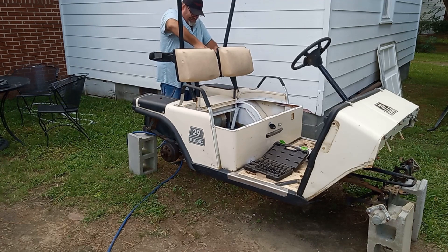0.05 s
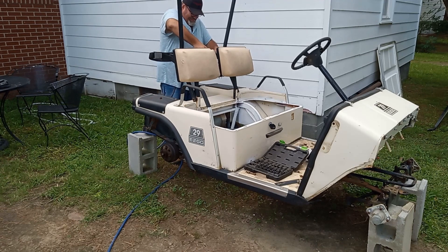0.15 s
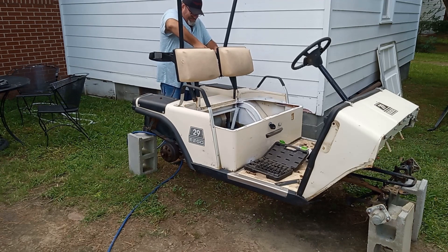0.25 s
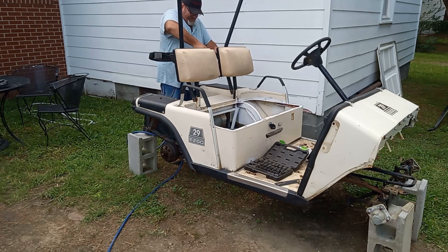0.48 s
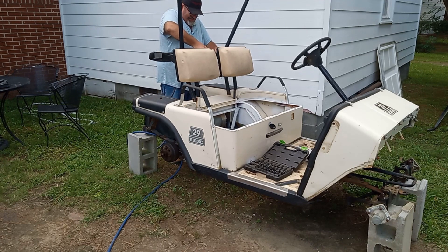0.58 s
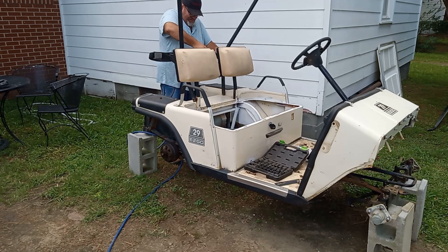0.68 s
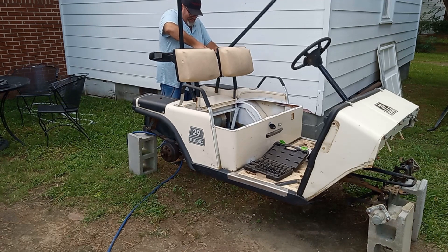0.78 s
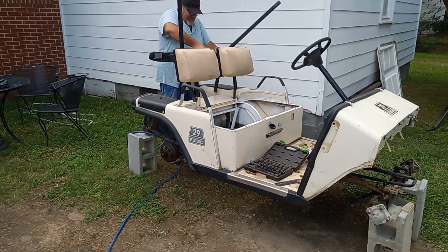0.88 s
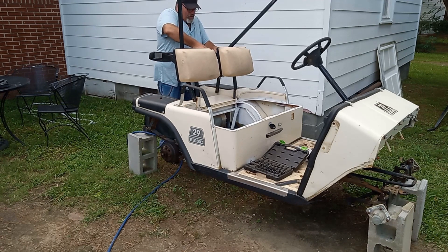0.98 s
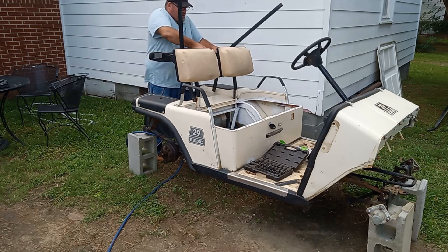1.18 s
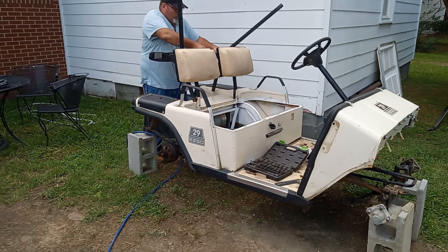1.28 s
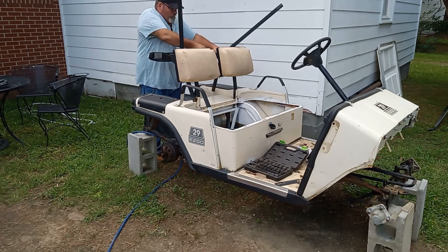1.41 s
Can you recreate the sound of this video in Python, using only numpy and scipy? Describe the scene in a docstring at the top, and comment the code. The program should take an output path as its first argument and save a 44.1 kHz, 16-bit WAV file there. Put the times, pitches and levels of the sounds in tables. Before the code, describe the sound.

A metal strut on a cart judders and snaps loose with a bright click, then clunks down twice

```python
"""A low hum, open air and a thin band of insects lie under the whole scene, the insects growing louder late;
a few swells of rumble pass. This background is made of sines and coloured noise.
Over it a metal strut on a cart is worked loose: it scrapes, judders in its joint and snaps free with a bright click.
The cart's frame shudders; the strut swings over, lands with a rattling clunk and settles with a lighter one.
Hits are ringing noise and fading sine tones, edge knocks are short noise bursts, and scrapes are gritty hiss."""
import sys
import numpy as np
from scipy import signal
from scipy.fft import rfft, irfft
from scipy.io import wavfile

SR = 44100
rng = np.random.default_rng(int(sys.argv[2]) if len(sys.argv) > 2 else 0)


def materialize(psi):
    """Save the field psi as 16-bit PCM at rate SR to the path in sys.argv[1].

    A 1-D psi becomes a single channel; in a 2-D psi each row is a channel.
    """
    bounded = np.clip(np.atleast_2d(psi).T, -1, 1)
    quanta = np.round(bounded * 32767).astype(np.int16)
    wavfile.write(sys.argv[1], SR, quanta)


N = 63945  # length of the scene [samples]
TIME = np.arange(N) / SR  # clock of the whole scene [s]
RING_S = np.arange(32768) / SR  # clock of one ringing hit [s]


def amp(db):
    """Turns decibels into a plain multiplier."""
    return 10 ** (np.asarray(db) / 20)


def unit(x):
    """Scales a signal to an average (RMS) size of 1."""
    return x / np.sqrt(np.mean(x ** 2) + 1e-20)


def read(points, hz):
    """Reads between the points of a (frequency, value) table, on a log-frequency axis."""
    f, value = np.transpose(points)
    return np.interp(np.log(hz + 1), np.log(f + 1), value)


def add(mix, s, sound):
    """Adds a sound to the mix at s seconds, cut off at the end of the mix."""
    part = mix[:, round(s * SR):][:, :sound.shape[1]]
    part += sound[:, :part.shape[1]]


def noise(colour, likeness, size, tilt_db=0):
    """Unit-size stereo noise; what left and right share sets their likeness, tilt_db is dB per octave."""
    hz = np.fft.rfftfreq(size, 1 / SR)
    mid, side = np.exp(2j * np.pi * rng.random((2, len(hz))))
    same = np.clip(read(likeness, hz), -1, 1)
    mid = mid * np.sqrt(1 + same)
    side = side * np.sqrt(1 - same)
    level = amp(read(colour, hz) + tilt_db * np.log2(hz + 1))
    return unit(irfft(np.array([mid + side, mid - side]) * level, size))


def drift(rate_hz):
    """A random wander of unit size: noise with everything much faster than rate_hz smoothed away."""
    hz = np.fft.rfftfreq(N, 1 / SR)
    return unit(irfft(rfft(rng.standard_normal(N)) * np.exp(-(hz / rate_hz) ** 2), N))


def humps(table):
    """A level that rises and falls in a bell shape round each peak."""
    out = 0
    for s, rise, fall, db in table:
        width = np.where(TIME < s, rise, fall)
        out = out + amp(db) * np.exp(-.5 * ((TIME - s) / width) ** 2)
    return out


CLUSTER_HZ = 55.1  # width of a cluster of modes
SCATTER_AT_700_HZ_DB = 5  # largest boost or cut at 700 Hz; smaller below, larger above


def mode_clusters():
    """An object's own uneven response: some clusters of its modes are strong, others weak."""
    hz = np.fft.rfftfreq(len(RING_S), 1 / SR)
    chance = rng.standard_normal(len(hz))
    uneven = np.tanh(np.interp(hz / CLUSTER_HZ, np.arange(len(hz)), chance))
    return amp(SCATTER_AT_700_HZ_DB * uneven * 2 * hz / (hz + 700))


# how alike the cart sounds on the left and the right: (frequency [Hz], likeness [-1 to 1])
CART_LIKENESS = [(100, 0.97), (450, 0.81), (1400, 0.46), (4000, 0.058), (6500, 0.2), (8500, 1),
                 (10500, 0.95), (15000, .7)]


def dense_ring(colour, t60s, clusters, bass_rise_s, tilt_db=0):
    """Countless close modes struck at once: the bass builds more slowly, each band dies at its own speed."""
    size = len(RING_S)
    struck = rfft(noise(colour, CART_LIKENESS, size, tilt_db))
    spectrum = rfft(unit(irfft(struck * clusters)))
    hz = np.fft.rfftfreq(size, 1 / SR)
    centres = np.geomspace(100, 15000, 8)  # middles of eight overlapping bands [Hz]
    out = 0
    for centre, share in zip(centres, np.eye(len(centres))):
        band = irfft(spectrum * read(np.c_[centres, share], hz))
        rise = 1 - np.exp(-RING_S / (bass_rise_s * np.sqrt(centres[0] / centre)))
        fade = amp(-60 * RING_S / read(t60s, centre))  # t60 is the time to fall by 60 dB
        out = out + band * rise * fade
    return out


WAVER_DB = 1.5  # typical waver of a mode's level


def modes(table):
    """Single decaying modes that waver in level, each reaching the two ears at its own phase."""
    out = 0
    for hz, db, t60 in table:
        turn, side = rng.random(2)
        likeness = np.clip(read(CART_LIKENESS, hz), -1, 1)
        spread = np.arccos(likeness) / 2 * np.sign(side - .5) * np.array([[1], [-1]])
        level = amp(db - 60 * RING_S / t60 + WAVER_DB * drift(26)[:len(RING_S)])
        tone = np.sin(2 * np.pi * (hz * RING_S + turn) + spread)
        out = out + level * tone * np.minimum(RING_S * hz / 2, 1)  # fades in over two cycles
    return out


# colour of the open air: (frequency [Hz], relative level [dB per Hz])
AIR_COLOUR = [(20, -18.5), (50, -9), (80, 1), (150, 0), (230, -9), (1000, -10.5), (2000, -17), (4000, -31),
              (8000, -47), (15500, -35)]
# how alike the background is on the left and the right: (frequency [Hz], likeness [-1 to 1])
AIR_LIKENESS = [(100, 0.98), (300, 0.82), (700, 0.0054), (1400, -0.48), (4000, 0.12), (7000, 0.76),
                (11000, 0.68)]


def open_air():
    """Soft, wide noise, strongest in the bass, whose level drifts slightly."""
    return amp(-63.0) * noise(AIR_COLOUR, AIR_LIKENESS, N) * amp(0.51 * drift(8))


# tones of the hum: (frequency [Hz], level before wavering [dB])
HUM_TONES = [(73, -70.5), (118, -77.5), (155, -71)]
HUM_WAVER_DB = 3


def hum():
    """A few low tones whose level and pitch waver slowly."""
    out = 0
    for hz, db in HUM_TONES:
        level = amp(db + HUM_WAVER_DB * drift(5))
        pitch_hz = hz * (1 + 0.02 * drift(3.8))
        out = out + level * np.sin(2 * np.pi * np.cumsum(pitch_hz) / SR)
    return out


# swells of the rumble: (time of the peak [s], rise [s], fall [s], level [dB])
RUMBLE_SWELLS = [(.012, 0.063, 0.017, -55), (.225, 0.059, 0.045, -52.5), (.765, 0.015, 0.0089, -59)]


def rumble():
    """Deep noise that swells up and dies away a few times."""
    # (frequency [Hz], relative level [dB per Hz])
    colour = [(35, -43.0), (62, -20.5), (78, 4), (100, -28.5), (150, -1), (230, -42.0), (600, -86.5)]
    return noise(colour, AIR_LIKENESS, N) * humps(RUMBLE_SWELLS)


def insects():
    """A shrill flickering band of noise that grows late, when a higher, pulsing buzz joins it."""
    # colours: (frequency [Hz], relative level [dB per Hz])
    chorus_colour = [(5600, -25.5), (6100, -13.0), (6400, -3.5), (6800, -2), (7200, -11.0), (7700, -49.5)]
    buzz_colour = [(6000, -43), (7600, -8.0), (8700, -2.0), (9300, -7), (10200, -41)]
    chorus_db = np.interp(TIME, [0, 1.15, 1.4], [-69, -69, -65])
    chorus = noise(chorus_colour, AIR_LIKENESS, N) * amp(chorus_db + 2.2 * drift(76))
    pulses = 1 + 0.55 * np.sin(2 * np.pi * 140 * TIME)  # 140 pulses a second
    buzz_db = np.interp(TIME, [1.12, 1.25, 1.45], [-110, -71, -73])
    buzz = noise(buzz_colour, CART_LIKENESS, N) * pulses * amp(buzz_db)
    return chorus + buzz


# metal sliding on metal: (time of the peak [s], rise [s], fall [s], level [dB])
SLIDES = [(.207, 0.017, 0.18, -48.5), (.48, 0.0092, 0.021, -55), (.672, 0.008, 0.0094, -76.5),
          (1.15, 0.0074, 0.016, -57), (1.315, 0.027, 0.021, -61)]
# colour of the scrape: (frequency [Hz], relative level [dB per Hz])
SCRAPE_COLOUR = [(40, -31), (1000, -8), (3000, -4), (7500, -13), (9300, 0), (10700, 1.5), (12500, -15),
                 (14500, 0)]
GRIT_DB = 1.8  # typical size of the fast, random roughness


def scrape():
    """A fine gritty hiss where the metal slides."""
    grit = unit(amp(GRIT_DB * drift(300)))
    return noise(SCRAPE_COLOUR, CART_LIKENESS, N) * humps(SLIDES) * grit


# shudders of the frame: (time [s], level before the build-up and fade [dB])
FRAME_SHUDDERS = [(.301, -30), (.349, -32), (.376, -33.5), (.455, -46.5), (.53, -58.5)]
# colour of the shudders: (frequency [Hz], relative level [dB per Hz])
FRAME_COLOUR = [(35, -52), (60, -26), (122, -8), (157, -16.5), (333, -4), (445, -5), (735, -3), (840, -10),
                (1410, -14.5), (2040, -20), (6000, -27), (13200, -110)]
# how long the frame rings: (frequency [Hz], time to fall by 60 dB [s])
FRAME_FADE = [(100, 0.51), (400, 0.37), (1000, 0.38), (4000, 0.41)]
# single tones of the frame: (frequency [Hz], relative level [dB], time to fall by 60 dB [s])
FRAME_TONES = [(211.6, 4, 0.18), (277.2, 3.5, 0.48), (384, -1.5, 0.54), (476, 3.5, 0.55), (724, 5, 0.32),
               (734, -3.5, 0.54), (836, -3, 0.45), (973, 1, 0.39), (1085, -4, 0.42), (1462, 7, 0.21)]
FRAME_TONES_DB = -42


def frame():
    """The released frame shudders, and its low modes swell and ring."""
    out, clusters = np.zeros((2, N)), mode_clusters()
    for s, db in FRAME_SHUDDERS:
        add(out, s, amp(db) * dense_ring(FRAME_COLOUR, FRAME_FADE, clusters, 0.0059))
    swell = 1 - np.exp(-RING_S / 0.0071)
    add(out, FRAME_SHUDDERS[1][0], amp(FRAME_TONES_DB) * modes(FRAME_TONES) * swell)
    return out


# clank of the strut's first contact: (frequency [Hz], relative level [dB], time to fall by 60 dB [s])
CLANK_TONES = [(257, 6, 0.31), (340, 5.5, 0.21), (715, 0.5, 0.074), (1353, -1, 0.07), (1564, 0.5, 0.12),
               (2463, 1, 0.045), (2450, -5.5, 0.25), (4640, 0.5, 0.07)]
# strut landing on the body:
# (time [s], level before the build-up and fade [dB], brightness [dB per octave])
BODY_CLUNKS = [(0.9932, -46.5, 2.5), (1.002, -38, 1), (1.021, -35.5, 1.5), (1.038, -36.5, -1),
               (1.056, -40, -1), (1.092, -47, -0.5), (1.22, -65.5, -3.5), (1.301, -56, -1.5),
               (1.318, -56.5, 1.5), (1.414, -66.5, 4)]
# colour of the clunks: (frequency [Hz], relative level [dB per Hz])
BODY_COLOUR = [(35, -39), (87, -6), (130, -9.5), (165, -7), (270, -3), (440, -7), (530, -7), (790, -10.5),
               (1100, -15), (1500, -12.5), (2000, -19.5), (5500, -27.5), (7400, -39), (15400, -41.5)]
# how long the body rings: (frequency [Hz], time to fall by 60 dB [s])
BODY_FADE = [(100, 0.48), (280, 0.47), (700, 0.3), (2000, 0.26), (6000, 0.32), (14000, 0.43)]
# single tones of the body's boom: (frequency [Hz], relative level [dB], time to fall by 60 dB [s])
BOOM_TONES = [(105, 4.5, 0.32), (200.5, -4.5, 0.56), (255, -0.5, 0.54), (268.6, -1, 0.4),
              (391.2, -3.5, 0.49), (536, -4.5, 0.35), (650, -7.5, 0.24), (732, -8, 0.46)]
# light metal taps: (time [s], level [dB])
LIGHT_TAPS = [(1.3091, -52.5)]
# single tones of a tap: (frequency [Hz], relative level [dB], time to fall by 60 dB [s])
TAP_TONES = [(136.7, 0, 0.41), (433, 2, 0.15), (471, -1, 0.26), (685, 0.5, 0.077), (1408, -9, 0.14),
             (3340, -8, 0.084), (3950, -8.5, 0.23), (6040, 1, 0.1)]
CLANK_DB, BOOM_S, BOOM_DB = -43.5, 1.022, -39


def landing():
    """The strut clanks and bounces on the hollow body, which booms; then it settles with a tap."""
    out, clusters = np.zeros((2, N)), mode_clusters()
    add(out, BODY_CLUNKS[0][0], amp(CLANK_DB) * modes(CLANK_TONES))
    for s, db, tilt_db in BODY_CLUNKS:
        add(out, s, amp(db) * dense_ring(BODY_COLOUR, BODY_FADE, clusters, 0.0017, tilt_db))
    add(out, BOOM_S, amp(BOOM_DB) * modes(BOOM_TONES))
    for s, db in LIGHT_TAPS:
        add(out, s, amp(db) * modes(TAP_TONES))
    return out


# steel edges knocking together:
# (time [s], level of the tick before its fade [dB], brightness [dB per octave])
EDGE_STRIKES = [(0.2291, -34, -3), (0.2477, -28.5, -3.5), (0.2618, -27.5, -5.5), (0.2699, -24.5, 5),
                (0.2872, -25.5, -5.5), (0.313, -32, 3), (0.9932, -40, -1), (1.011, -37.5, 8.5),
                (1.029, -34, -8.5), (1.3090, -47.5, 7.5)]
# colour of the tick and its rattle: (frequency [Hz], relative level [dB per Hz])
TICK_COLOUR = [(40, -65), (200, -20), (700, -8.5), (2200, -6), (3300, -2.5), (5800, 2), (7200, -18),
               (15000, -19)]
TICK_S, RATTLE_S = 0.0015, 0.0142  # time constants of the two fades
RATTLE_DB = -11.5  # start of the rattle, relative to the tick


def strikes():
    """Steel edges knock together: a hard broad tick, then a brief rattle."""
    out = np.zeros((2, N))
    for s, db, tilt_db in EDGE_STRIKES:
        fall = np.exp(-RING_S / TICK_S) + amp(RATTLE_DB) * np.exp(-RING_S / RATTLE_S)
        add(out, s, amp(db) * fall * noise(TICK_COLOUR, CART_LIKENESS, len(RING_S), tilt_db))
    return out


# strut juddering in its joint:
# (time [s], level before the rasp, build-up and fade [dB], brightness [dB per octave])
JOINT_JUDDERS = [(0.2303, -38, -2.5), (0.245, -34.5, -1.3), (0.2621, -30.5, -0.76), (.597, -68.5, -5.5)]
# colour of the judders: (frequency [Hz], relative level [dB per Hz])
JOINT_COLOUR = [(35, -53), (60, -27.5), (250, -19), (345, -9), (478, 0.5), (590, -12.5), (780, -9.5),
                (1080, -7), (1240, -20.5), (1400, -6.5), (2130, -9.5), (2280, -12.5), (5160, -6),
                (7850, -18), (9240, -13), (13100, -25), (15800, -7)]
# how long the joint rings: (frequency [Hz], time to fall by 60 dB [s])
JOINT_FADE = [(150, .35), (600, 0.43), (2000, 0.38), (5000, 0.54), (9000, 0.55), (15000, 0.38)]
# the joint's first give: (frequency [Hz], relative level [dB], time to fall by 60 dB [s])
CREAK_TONES = [(1140, -1.5, 0.095), (1320, 4, 0.03), (1560, 0.5, 0.13)]
# the bracket knocked by the first slip: (frequency [Hz], relative level [dB], time to fall by 60 dB [s])
BRACKET_TONES = [(215.2, -5, .5), (367, -6.5, 0.66), (470, 2, .22)]
CREAK_S, CREAK_DB, BRACKET_DB = 0.2112, -46.5, -38


def joint():
    """The strut sticks and slips: each slip is a short rasp with a longer ring."""
    out, clusters = np.zeros((2, N)), mode_clusters()
    for s, db, tilt_db in JOINT_JUDDERS:
        rasp = amp(3.0) + amp(1.5) * np.exp(-RING_S / .012)
        ring = dense_ring(JOINT_COLOUR, JOINT_FADE, clusters, 0.014, tilt_db)
        add(out, s, amp(db) * rasp * ring)
    add(out, CREAK_S, amp(CREAK_DB) * modes(CREAK_TONES))
    add(out, JOINT_JUDDERS[0][0], amp(BRACKET_DB) * modes(BRACKET_TONES))
    return out * amp(GRIT_DB * drift(201))


# steel snapping free, its crack echoed twice close behind, more faintly: (time [s], level before the build-up
# and fade # [dB])
STEEL_SNAPS = [(0.2876, -15.5), (0.2922, -23), (0.2955, -23.5)]
# colour of the cracks: (frequency [Hz], relative level [dB per Hz])
CRACK_COLOUR = [(900, -47), (2400, -25.5), (3200, -9), (4800, -13.5), (6100, -6), (7700, -7.5), (8500, -21),
                (10200, -16), (10850, 6), (11500, -18.5), (13500, -15.5), (15100, -7), (15800, -19)]
# how long a crack rings: (frequency [Hz], time to fall by 60 dB [s])
CRACK_FADE = [(2000, 0.03), (15000, 0.041)]
# single tones of the strut: (frequency [Hz], relative level [dB], time to fall by 60 dB [s])
STRUT_TONES = [(5241, -7, .45), (5655, -4, .74), (5783, 5, .36), (5944, -1, .33), (7660, -8, .26),
               (9350, 0, .33), (9945, -4, .29), (10839, 4, .24), (10908, 4, .25), (11023, -2, .22),
               (14870, -2, .2), (15214, 1, .24)]
# the strut's shimmer of close high modes: (frequency [Hz], relative level [dB per Hz])
SHIMMER_COLOUR = [(3000, -11.5), (5000, -16.5), (5500, -16), (5800, -7), (6150, -7), (6900, -11),
                  (7350, -26), (7750, -9), (8300, -19.5), (9350, -10), (10200, -7), (10850, 2.5),
                  (11600, -8.5), (12200, -13), (12800, -7), (13700, -20), (14700, 3), (15500, -1.5)]
# how long the shimmer rings: (frequency [Hz], time to fall by 60 dB [s])
SHIMMER_FADE = [(4000, 0.53), (7000, 0.43), (11000, .32), (15000, 0.32)]
STRUT_DB, SHIMMER_DB = -36, -24.5


def snap():
    """The joint lets go: hard cracks, and the steel rings on in a shimmer of close modes."""
    out, clusters = np.zeros((2, N)), mode_clusters()
    for s, db in STEEL_SNAPS:
        add(out, s, amp(db) * dense_ring(CRACK_COLOUR, CRACK_FADE, clusters, 0.0039))
    tones = amp(STRUT_DB) * modes(STRUT_TONES)
    shimmer = amp(SHIMMER_DB) * dense_ring(SHIMMER_COLOUR, SHIMMER_FADE, clusters, 0.0067)
    add(out, STEEL_SNAPS[0][0], tones + shimmer)
    return out


# where the cart sits between the ears: (frequency [Hz], left minus right [dB])
CART_BALANCE = [(100, 0.5), (1000, 2), (4000, 0.5), (10000, -1), (15000, -1.5)]


def scene():
    """Places the cart between left and right, in front of the yard's background."""
    background = open_air() + hum() + rumble() + insects()
    cart = scrape() + frame() + landing() + strikes() + joint() + snap()
    balance_db = read(CART_BALANCE, np.fft.rfftfreq(N, 1 / SR)) * np.array([[.5], [-.5]])
    return background + irfft(rfft(cart) * amp(balance_db), N)


EDGE_HZ = 15750  # upper edge of the sound


def record(dry):
    """The recorder's band limit: a steep filter removes the treble above the edge."""
    low_pass = signal.firwin(511, EDGE_HZ, window=("kaiser", 9), fs=SR)
    return signal.oaconvolve(dry, low_pass[None], "same")


dry = scene()
out = record(dry)
materialize(out)
```